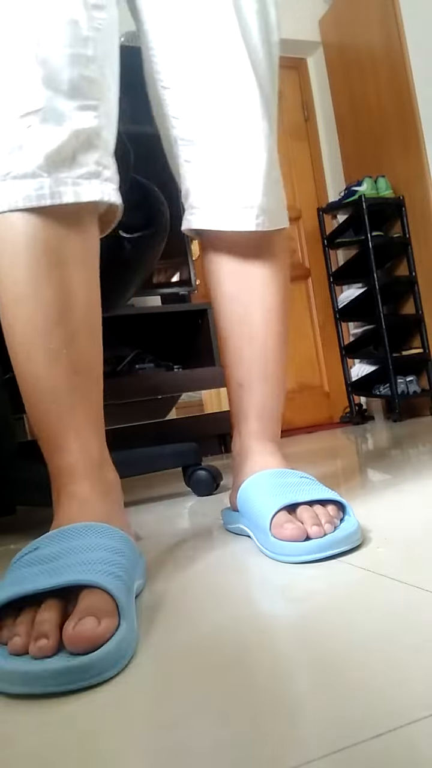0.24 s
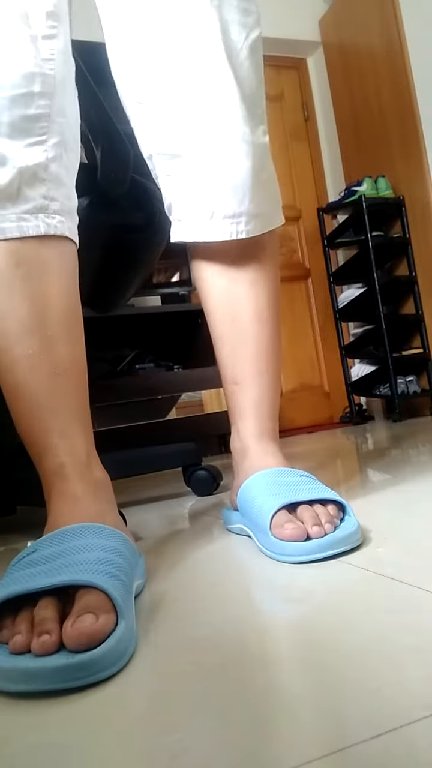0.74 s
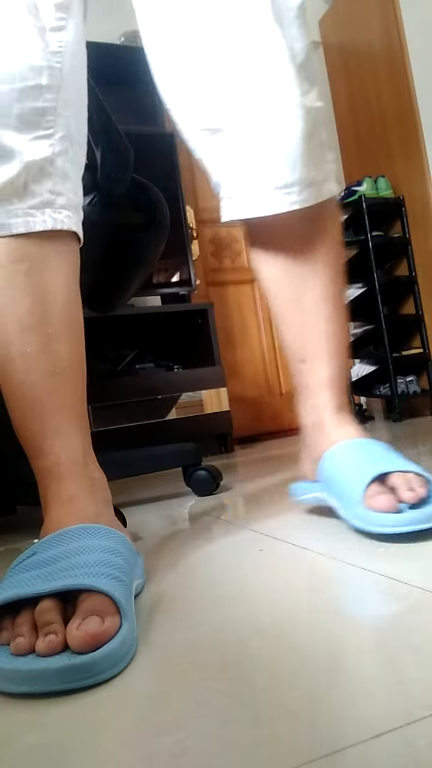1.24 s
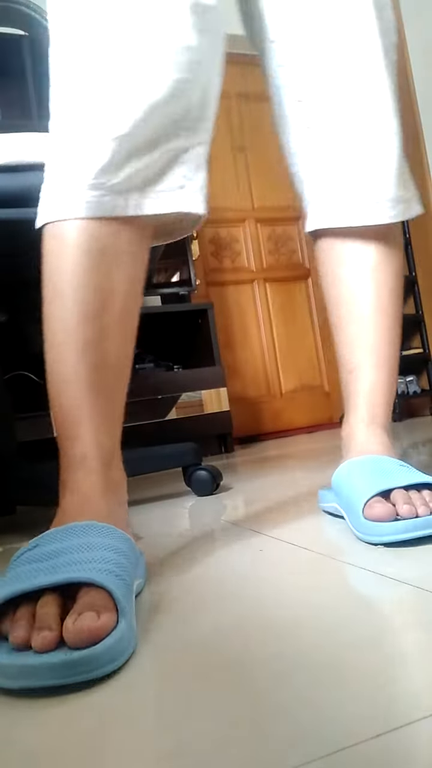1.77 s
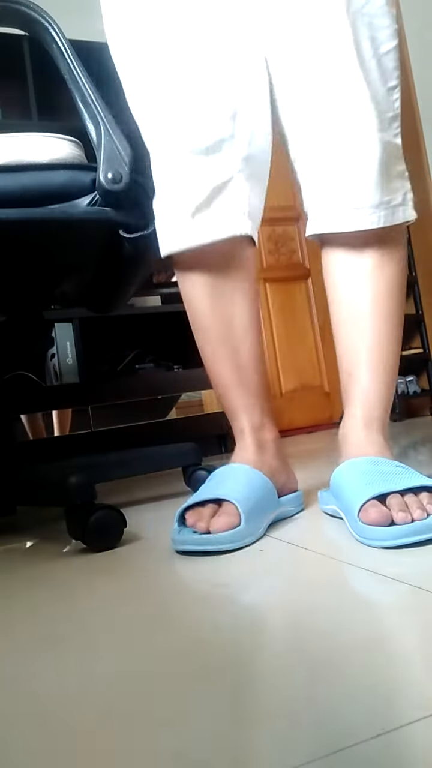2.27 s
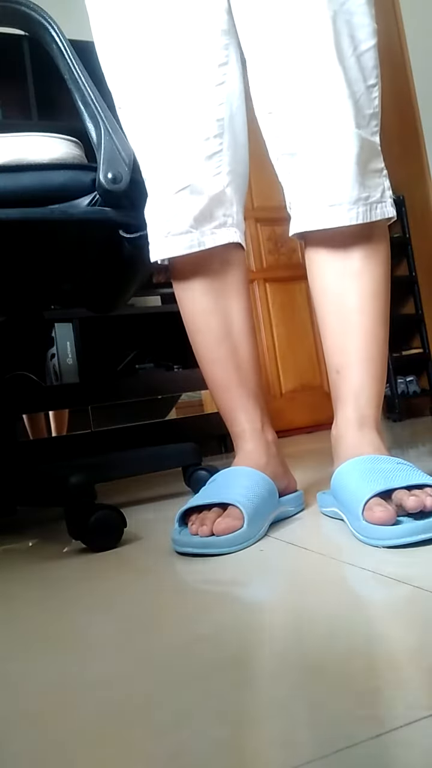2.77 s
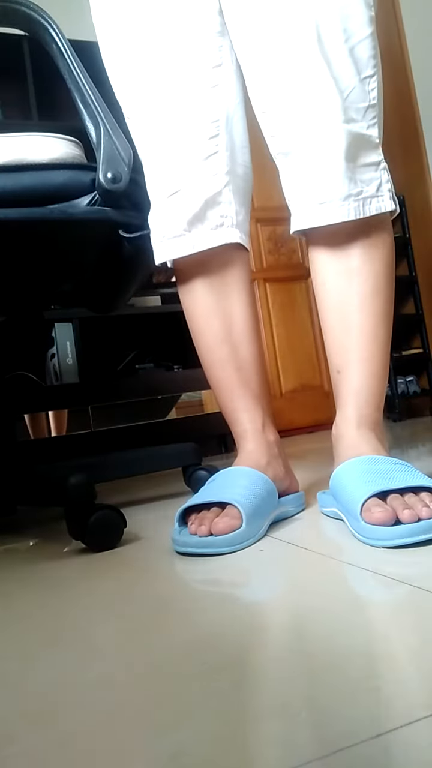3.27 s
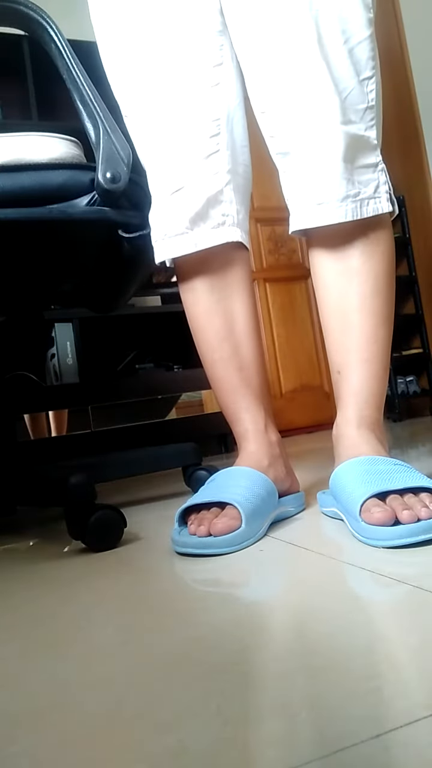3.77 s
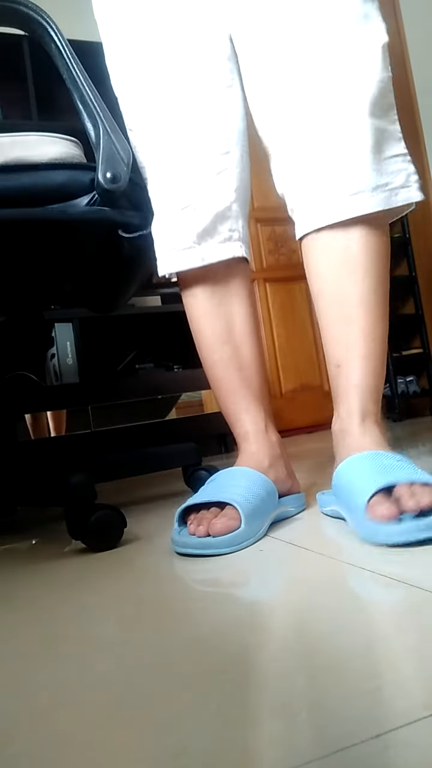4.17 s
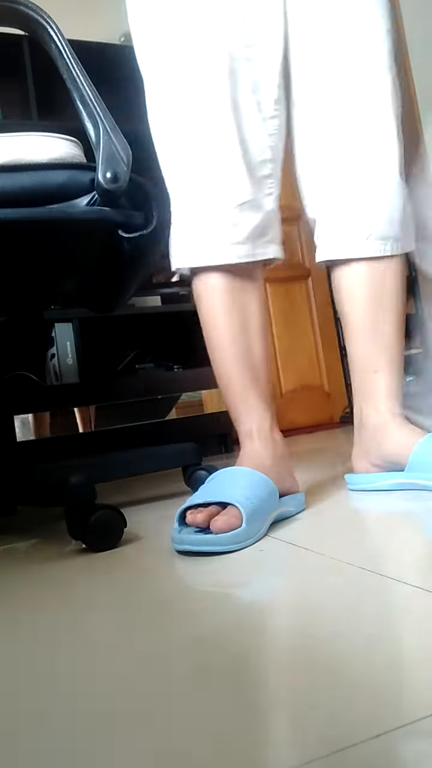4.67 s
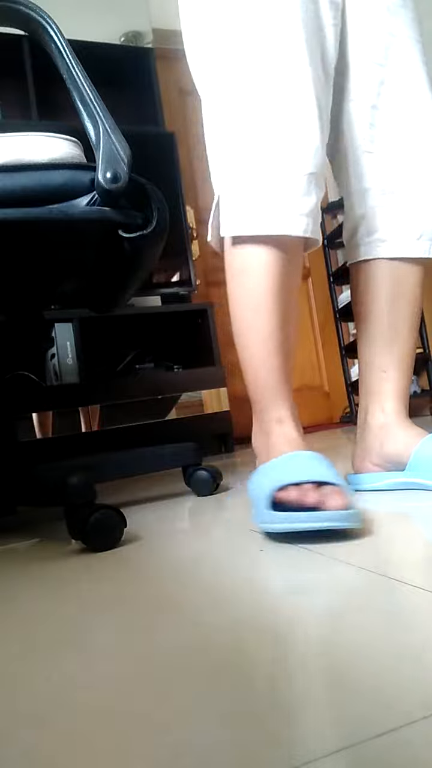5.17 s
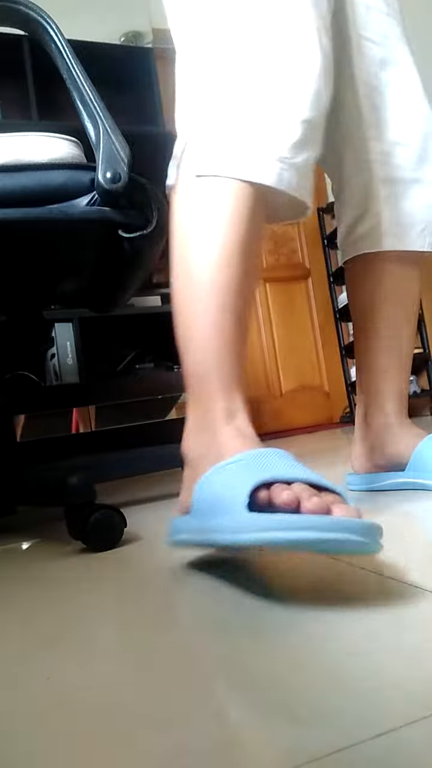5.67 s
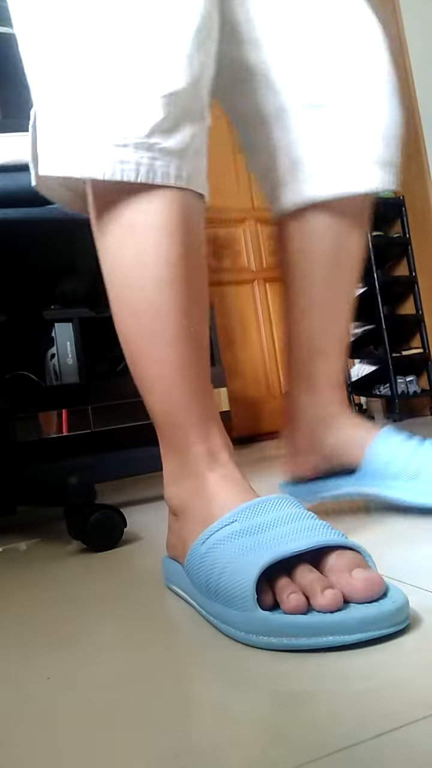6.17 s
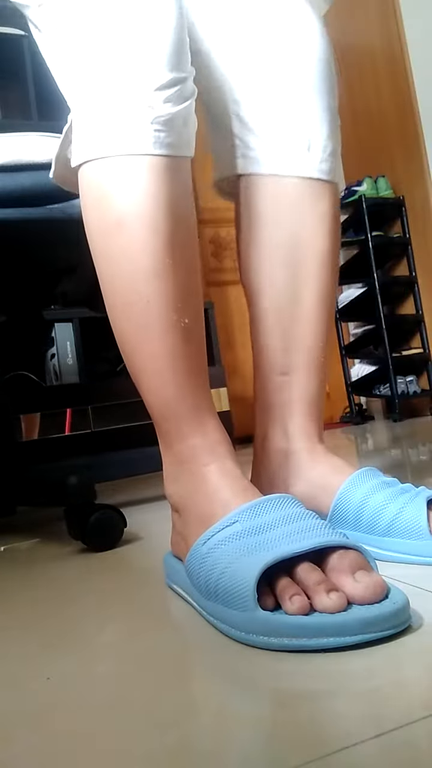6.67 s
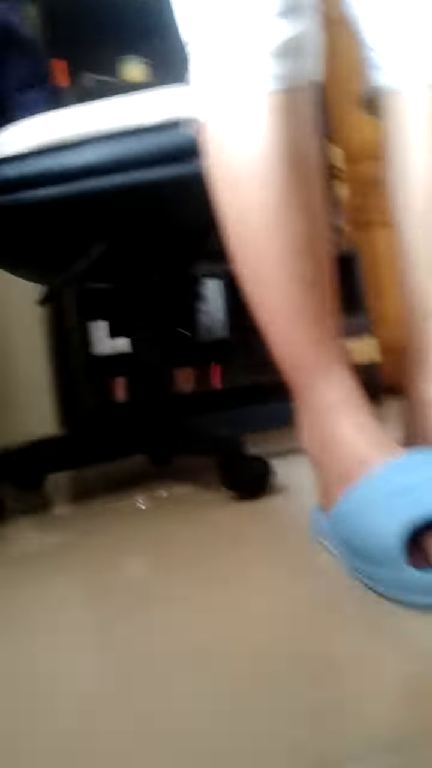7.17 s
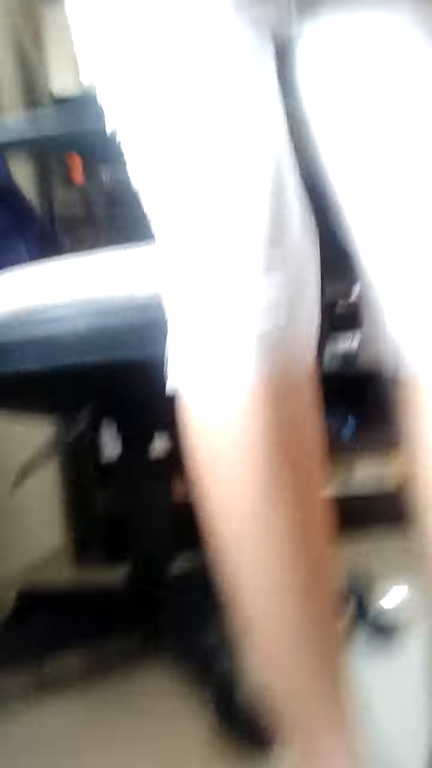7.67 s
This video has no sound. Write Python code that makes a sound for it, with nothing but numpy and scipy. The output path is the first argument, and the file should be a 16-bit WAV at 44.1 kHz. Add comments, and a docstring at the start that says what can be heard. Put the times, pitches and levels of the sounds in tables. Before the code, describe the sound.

A phone near the floor of a small hard room picks up a person stepping in foam slides. Faint ticks and cloth rustle come first, then a sharp squeaky scuff, a chirp, a loud hollow knock with smaller taps, a rising squeak, and later clicks and a brief squeak as the feet come closer. Steady hiss and lumpy low rumble continue throughout.

```python
"""Foam sandals on tile

A small hard room with a tiled floor, heard from a phone near the ground as the feet move near and far.
The soles squeak in short stick-slip glides, tick in short rings as they peel and knock as a push rings
sole and floor; scuffs and rustling trousers are shaped noise, and soft thumps are low fading tones.
A steady hiss and a lumpy low rumble lie under it, and the phone's gain sinks after the loudest sounds."""
import sys
import numpy as np
from scipy import signal
from scipy.fft import rfft, irfft, next_fast_len
from scipy.io import wavfile
from scipy.ndimage import uniform_filter1d, map_coordinates

SR = 44100
rng = np.random.default_rng(int(sys.argv[2]) if len(sys.argv) > 2 else 0)


def waveform_to_disk(signal):
    """Save audio, clipped to [-1, 1], as 16-bit WAV at the path in sys.argv[1]."""
    frames = np.transpose(np.atleast_2d(signal))
    scaled = np.clip(frames, -1, 1) * 32767
    samples = np.round(scaled).astype(np.int16)
    wavfile.write(sys.argv[1], SR, samples)


N = 349429  # length in samples

# All source levels are ahead of the microphone; colours are relative, since each noise is set to rms 1.
# Colours of the background: hiss, its wavering low edge, rumble, murmur, deep rumble: pitch_hz, level_db
HISS_COLOUR = [(700, -14.5), (850, -16.5), (1050, 6.5), (1300, 4.5), (2900, 3.5), (4000, -2), (5000, -12.5),
               (7000, -12.5), (10000, -8), (15700, 3.5)]
HISS_EDGE_COLOUR = [(480, -23.5), (600, -7.5), (750, -10.5), (900, 3.5), (1050, -1), (1300, -25)]
RUMBLE_COLOUR = [(55, -32), (75, -15), (95, 0.5), (120, -13.5), (160, -9), (220, -36)]
MURMUR_COLOUR = [(130, -0.5), (170, -11), (250, 2), (330, -5.5), (550, -9.5), (700, -23)]
DEEP_COLOUR = [(12, -19), (25, 9), (35, -11), (52, 8.5), (65, -3.5), (85, -62)]
# Background levels before the random swells: time_s, rumble_db, murmur_db, hiss_edge_db, deep_db
LOW_LEVELS = [(0.0, -63, -75.5, -56.5, -66), (0.6, -56, -62.5, -68, -59.5), (0.93, -58, -64.5, -63, -62),
              (1.39, -60.5, -62, -63.5, -58.5), (1.7, -55, -71, -57, -55), (1.98, -62, -69.5, -51, -60.5),
              (2.56, -61, -66, -57.5, -62), (3.04, -60.5, -71, -56.5, -64), (3.22, -53, -63.5, -52, -62),
              (3.46, -52, -53, -43.5, -61), (3.62, -74, -105, -51, -57), (3.84, -64, -71, -60, -64.5),
              (4.12, -62, -68, -57.5, -67), (4.59, -63, -69, -53.5, -64), (4.89, -47.5, -66, -56.5, -53),
              (5.23, -52.5, -60.5, -54.5, -56), (5.47, -60.5, -64.5, -52, -66), (5.78, -60, -62, -55, -62),
              (6.24, -63, -70.5, -56.5, -65), (6.51, -50.5, -64.5, -47.5, -55),
              (6.97, -62.5, -66.5, -59, -61.5), (7.34, -49, -61, -61, -60), (7.63, -67, -66, -73, -72),
              (7.92, -54, -71, -61, -64)]
HISS_DB = -42
LUMPS_PER_S, LUMP_DB, SHARED_DB = 8, 3, 2.5  # random swells: knots a second, each layer alone, all together

# Knocks of the sole landing: start_s, level_db (relative), floor_thud_db (relative to sole), hardness_hz
KNOCKS = [(0.082, -32, -11.5, 1500), (3.297, -22, -3.5, 1800), (3.3009, -23, -10, 1480),
          (3.305, -28, -6, 1500), (3.3115, -1, -20.5, 1420), (3.4035, -23, -24, 1200),
          (3.4065, -22, -29, 1230), (3.4102, -19, -25, 1180), (3.416, -20, -22, 950),
          (3.4924, -22.5, -33, 1600), (3.5035, -28, -45, 1440), (3.5112, -29, -38, 1140),
          (3.5188, -35, -18.5, 1280), (4.654, -34, -9.5, 1200), (4.66, -37, -10, 1000),
          (4.684, -33, -35, 990), (5.957, -27, -47, 900), (6.413, -25, -7, 1490), (7.124, -35, -15, 1500),
          (7.888, -37.5, -16, 1500)]
# Modes of the hollow sole: pitch_hz, width_hz, level_db
SOLE_MODES = [(576, 217, 8.5), (680, 365, 6), (1140, 290, 2), (1600, 1240, -8)]
# Modes of the floor and the air over it: pitch_hz, width_hz, level_db
FLOOR_MODES = [(97.2, 4, -3.5), (146, 10.7, -1.5), (238.7, 26, 7.5), (249, 125, -2)]
# Sole and skin peeling apart: start_s, level_db (relative), pitch_hz, ring_t60_s (before its limits),
# crack_db (relative to ring)
TICKS = [(0.0827, -31, 1850, 0.018, -4), (1.038, -33, 1930, 0.013, -4), (1.076, -33, 2380, .012, -12),
         (1.842, -27, 3060, 0.0074, -2), (1.8592, -26, 3050, 0.0089, 2), (1.8844, -45, 2040, .012, 0),
         (1.9148, -33, 2240, 0.0091, 0), (4.3055, -27, 2550, 0.011, -6), (4.634, -33, 2300, 0.018, -23),
         (5.9305, -9.5, 1800, 0.0017, -34), (5.9546, -21.5, 1690, 0.0054, -17),
         (5.9585, -24, 2040, .01, -19), (6.063, -32, 2300, 0.014, -4), (6.348, -25.5, 1660, 0.0087, -14),
         (6.3614, -17.5, 1820, 0.0042, -16), (6.391, -23, 2070, 0.0066, -8),
         (7.1244, -8.5, 1850, 0.0021, -15), (7.349, -51.5, 2000, .01, 19.5), (7.539, -39, 1740, .012, -5),
         (7.8893, -36.5, 2710, 0.014, -28)]
# Swells of cloth: start_s, length_s, start_level_db, end_level_db
RUSTLES = [(.28, .33, -37.5, -41.5), (.85, 0.061, -48, -52), (3.91, .11, -61, -58), (4.85, 0.18, -50, -48)]
# Colour of the cloth: pitch_hz, level_db
CLOTH_COLOUR = [(3000, -29), (6000, -2.5), (8700, -0.5), (11600, 11), (15500, 7)]
RUSTLE_RISE_DB_PER_S, RUSTLE_FALL_DB_PER_S = 750, 480
# Weight shifting and phone handling: start_s, level_db (before the soft start), pitch_hz, t60_s
THUMPS = [(0.346, -31, 97.7, 0.16), (0.435, -32.5, 86, 0.15), (2.212, -40, 94, 0.3),
          (3.069, -36, 95.5, 0.32), (3.306, -23.5, 88.6, 0.2), (4.768, -31.5, 94.5, 0.18),
          (4.996, -33.5, 88, 0.13), (5.078, -31.5, 90.5, 0.12), (5.688, -32, 103.4, 0.14),
          (6.417, -34, 97, 0.4), (6.469, -27, 92.6, 0.21), (6.649, -37, 99, 0.26), (5.71, -37, 159, 0.17),
          (7.185, -38, 252, 0.14), (7.285, -36, 146, 0.2), (7.59, -43, 250, 0.13),
          (7.402, -31.5, 139, 0.19)]
# A sole slaps flat and drags: start_s, length_s, start_level_db, end_level_db (before the grains)
SCUFFS = [(1.04, 0.045, -51, -38.5), (1.845, 0.12, -39.5, -44.5), (1.94, 0.071, -19, -48),
          (3.297, 0.13, -28.5, -60), (4.311, 0.031, -25.5, -35.5), (6.065, 0.22, -33, -78),
          (6.153, .047, -57, -39), (6.414, 0.019, -28.5, -51), (7.889, 0.02, -35.5, -74)]
# Colour of the grit: pitch_hz, level_db
GRIT_COLOUR = [(300, -63), (600, 2.5), (2500, 10), (6000, 0), (9000, 1), (15000, 11)]
SCUFF_RISE_DB_PER_S, SCUFF_FALL_DB_PER_S = 9000, 2500
# Sole slipping on tile: start_slope_db, end_slope_db (overtones; above 0 counts as 0), roughness (0-1),
# glide of (time_s, slip_rate_hz, level_db before the bass cut)
SQUEAKS = [ (-14, -20, 0.31, [(1.936, 1910, -39), (1.941, 2264, -13), (1.95, 2247, -20.5),
           (1.955, 2265, -37), (1.962, 2370, -15.5), (1.97, 2400, -39.5)]),
           (0, -1, 0.43, [(1.939, 3230, -21.5), (1.953, 3037, -21.5), (1.957, 3080, -39)]),
           (-10, -0.5, 0.27, [(1.947, 950, -56), (1.953, 993, -25), (1.963, 1236, -17),
           (1.973, 1343, -16.5), (1.979, 1380, -49)]), (1, -10, .05, [(2.348, 5060, -35),
           (2.352, 4760, -31.5), (2.36, 4020, -25), (2.364, 3520, -34), (2.368, 3100, -39)]),
           (-8.5, -2, 0.11, [(2.367, 2590, -14), (2.371, 2448, -36), (2.378, 1678, -20.5),
           (2.386, 1437, -28), (2.396, 1420, -27), (2.404, 1300, -28)]),
           (-18, -20, 0.055, [(4.311, 2180, -37), (4.3125, 2280, -16.5), (4.3155, 2317, -30),
           (4.317, 2380, -39)]), (11, -3, 0.32, [(4.317, 2590, -34), (4.321, 2963, -27),
           (4.33, 3530, -24.5), (4.336, 3700, -23.5), (4.34, 3980, -20), (4.343, 4230, -34),
           (4.348, 4420, -24)]), (-3, -1, 0.56, [(6.064, 1020, -68), (6.082, 1206, -38), (6.096, 938, -59),
           (6.114, 957, -41)]), (1.5, -9.5, 0.25, [(6.124, 1163, -41), (6.14, 1634, -34),
           (6.146, 1650, -36), (6.151, 1703, -14.5), (6.156, 1876, -22), (6.165, 2020, -26)]),
           (-25, -30, 0.26, [(6.385, 4740, -41), (6.387, 3870, -22), (6.391, 3700, -45)]), ]

# Nearest surfaces: delay_s, level_db (relative)
WALLS = [(.0011, -9.5), (.0027, -9), (.0046, -2), (.0071, -4), (.0098, 1.5), (.0134, 3), (0.0206, -10),
         (0.022, -15)]
# Decay of the room: pitch_hz, t60_s
ROOM_DECAY = [(100, 0.33), (500, 0.37), (1300, 0.42), (3500, 0.43), (9000, 0.39)]
# How much the room answers as the sounding foot is far from the phone or near: time_s, level_db (relative)
FOOT_DISTANCE = [(0, 3), (1.9, -4), (2.4, -2), (3.3, -7), (3.4, -13), (3.55, 4), (4.315, -13.5), (4.34, 0),
                 (5.9, -1), (6.15, -6.5), (6.4, 0.5), (7.12, -4.5), (7.92, 7.5)]
SOFT_HZ = 6100  # walls and furniture swallow the treble above this
# Colour of the phone microphone: pitch_hz, level_db
MICROPHONE = [(20, 3), (3600, 2), (4300, -2), (5000, -8), (7000, -17.5), (11600, -23.5), (15700, -31)]
TOP_HZ = 15780  # nothing is heard above this


def amp(db):
    """Gain of a level in dB."""
    return 10 ** (np.asarray(db) / 20)


def along(points, hz):
    """Values at hz, read between (Hz, value) points on a log axis."""
    f, v = np.transpose(points)
    return np.interp(np.log(hz + 1), np.log(f + 1), v)


def curves(rows):
    """One value per sample for each column after the time."""
    s, *cols = np.transpose(rows)
    return [np.interp(np.arange(N) / SR, s, c) for c in cols]


def filtered(x, response):
    """x passed through a complex response of frequency."""
    m = next_fast_len(N + SR // 2)
    spectrum = rfft(x, m) * response(np.fft.rfftfreq(m, 1 / SR))
    return irfft(spectrum, m)[..., :N]


def no_bass(x, corner_hz):
    """A small source sends out little bass: a gentle slope below the corner."""
    return filtered(x, lambda hz: 1j * hz / (corner_hz + 1j * hz))


def resonances(modes):
    """The causal response of a few damped modes, added with alternating sign."""
    def response(f):
        total = 0
        for k, (centre, width, db) in enumerate(modes):
            damping = 1j * f * width
            total = total + (-1) ** k * amp(db) * damping / (centre ** 2 - f * f + damping)
        return total
    return response


def noise(colour, patchy_db):
    """Coloured noise of rms 1 with patches of random gain in time and pitch."""
    z = signal.stft(rng.standard_normal(N), nperseg=2048)[2]
    field = uniform_filter1d(rng.standard_normal(z.shape), size=3, axis=0)
    field = uniform_filter1d(field, size=3, axis=1)
    x = signal.istft(z * amp(patchy_db * field / field.std()), nperseg=2048)[1][:N]
    # the colour falls away to -90 dB an octave beyond either end
    closed = [(colour[0][0] / 2, -90), *colour, (colour[-1][0] * 2, -90)]
    x = filtered(x, lambda hz: amp(along(closed, hz)))
    return x / x.std()


def wobble(rate):
    """A smooth random curve, rate knots a second."""
    knots = rng.standard_normal(int(N * rate / SR) + 4)
    return map_coordinates(knots, [np.arange(N) * rate / SR])


def strokes(rows, rise, fall):
    """Envelope of strokes: a rise, a steady drift in level, a fall (slopes in dB per s)."""
    t, total = np.arange(N) / SR, np.zeros(N)
    for s, length, start_db, end_db in rows:
        drift_db = np.interp(t, [s, s + length], [start_db, end_db])
        before_db = rise * np.maximum(s - t, 0)
        after_db = fall * np.maximum(t - s - length, 0)
        total += amp(drift_db - before_db - after_db)
    return total


def background():
    """A hiss over low noise layers that swell and sink at random, each alone and all together."""
    shared_db = SHARED_DB * wobble(LUMPS_PER_S)
    rumble_db, murmur_db, edge_db, deep_db = (
        db + shared_db + LUMP_DB * wobble(LUMPS_PER_S) for db in curves(LOW_LEVELS))
    rumble = amp(rumble_db) * noise(RUMBLE_COLOUR, patchy_db=1.5)
    deep = amp(deep_db) * noise(DEEP_COLOUR, patchy_db=0.3)
    murmur = amp(murmur_db) * noise(MURMUR_COLOUR, patchy_db=4.5)
    edge = amp(edge_db) * noise(HISS_EDGE_COLOUR, patchy_db=4.5)
    hiss = amp(HISS_DB) * noise(HISS_COLOUR, patchy_db=1.6)
    return hiss + rumble + deep + murmur + edge


def knocks():
    """A landing is a push, shorter when the blow is harder, that rings the sole and the floor."""
    sole, floor, t = np.zeros(N + SR), np.zeros(N + SR), np.arange(SR // 50) / SR
    for s, db, thud_db, hard_hz in KNOCKS:
        push = t * np.exp(-2 * np.pi * hard_hz * t)
        push /= push.sum()
        # the narrow modes take little of a push, hence the added gains
        sole[round(s * SR):][:len(t)] += amp(db + 30) * push
        floor[round(s * SR):][:len(t)] += amp(db + thud_db + 49.0) * push
    return filtered(sole[:N], resonances(SOLE_MODES)) + filtered(floor[:N], resonances(FLOOR_MODES))


def ticks():
    """Peeling gives a short damped ring with a thin crack of noise."""
    out, t = np.zeros(N + SR), np.arange(SR // 20) / SR
    soft_start = 1 - np.exp(-t / .0003)
    for s, db, hz, t60, crack_db in TICKS:
        t60 = np.clip(t60, 1 / 500, 1 / 60)
        ring = np.sin(2 * np.pi * hz * t) * amp(-60 * t / t60)
        crack = amp(crack_db - 60 * t / .01) * rng.standard_normal(len(t))  # dies in 10 ms
        out[round(s * SR):][:len(t)] += amp(db + 3.5) * (ring + crack) * soft_start
    return no_bass(out[:N], 900)


def rustle():
    """Trouser cloth rubbing: short swells of bright, faint noise."""
    swells = strokes(RUSTLES, RUSTLE_RISE_DB_PER_S, RUSTLE_FALL_DB_PER_S)
    return swells * noise(CLOTH_COLOUR, patchy_db=5.0)


def thumps():
    """Slow pushes: each is one low decaying ring with a soft start."""
    out, t = np.zeros(N + SR), np.arange(SR // 2) / SR
    soft_start = 1 - np.exp(-t / 0.013)
    for s, db, hz, t60 in THUMPS:
        ring = amp(db - 60 * t / t60) * np.sin(2 * np.pi * hz * t)
        out[round(s * SR):][:len(t)] += ring * soft_start
    return out[:N]


def scuffs():
    """A sole slapping and dragging over grit: coloured noise in uneven grains of 40 samples."""
    sizes = np.minimum(rng.exponential(size=N // 40 + 1), 3)
    grains = amp(2.5 * sizes.repeat(40)[:N] - 3)
    drags = strokes(SCUFFS, SCUFF_RISE_DB_PER_S, SCUFF_FALL_DB_PER_S)
    return drags * noise(GRIT_COLOUR, patchy_db=3.5) * grains


def squeaks():
    """Stick-slip: overtones on the slip rate, shaken by uneven grip, with a puff of noise at each slip."""
    out, k = np.zeros(N), np.arange(1, 9)[:, None]  # k numbers the overtones
    for first_db, last_db, rough, glide in SQUEAKS:
        s, *cols = np.transpose(glide)
        at = np.arange(round(s[0] * SR), round(s[-1] * SR))
        hz, db = (np.interp(at / SR, s, c) for c in cols)
        chance = rng.standard_normal((3, 4000))
        # smoothed over 40 samples, then restored to unit spread
        grip = uniform_filter1d(chance, size=40, axis=1)[:, :len(at)] * np.sqrt(40)
        slope_db = np.minimum(np.linspace(first_db, last_db, len(at)), 0)
        phase = np.cumsum(2 * np.pi * hz * (1 + 0.14 * rough * grip[0])) / SR
        # the slip is nearly symmetric, so even overtones are weaker
        overtone_db = slope_db * (k - 1) ** 1.64 - 5.0 * (k % 2 == 0)
        stack = amp(overtone_db) * np.sin(k * phase) * (k * hz < TOP_HZ)
        tone = (1 + 0.85 * rough * grip[1]) * stack.sum(0)
        puffs = amp(-13.0) * rough * chance[2, :len(at)] * (1 + np.cos(phase))
        out[at] += amp(db) * (tone + puffs) * signal.windows.tukey(len(at), .1)
    return no_bass(out, 700)


def walls(x):
    """Early echoes: delayed copies from the tiles, the furniture and the door."""
    return sum(amp(db) * np.pad(x, (round(s * SR), 0))[:N] for s, db in WALLS)


def room(x):
    """Each frequency dies at its own speed; the feet move, so each quarter second has its own tail."""
    step = SR // 4
    parts = np.pad(x, (0, -N % step)).reshape(-1, step)
    hz, t, z = signal.stft(rng.standard_normal((len(parts), SR * 3 // 4)), SR, nperseg=256)
    decay = amp(-60 * t / along(ROOM_DECAY, hz)[:, None])
    tails = signal.istft(z * decay, SR, nperseg=256)[1]
    tails = tails / np.linalg.norm(tails, axis=1, keepdims=True)
    wet = signal.fftconvolve(parts, tails, axes=1)
    out, lag = np.zeros(N + 2 * SR), round(.006 * SR)  # the tail starts 6 ms late
    for k, w in enumerate(wet):
        out[lag + k * step:][:len(w)] += w
    return out[:N]


def scene():
    """The feet with the room's answer, over thumps, rustle and background."""
    bed, low, clicks = background(), knocks(), ticks()
    cloth, pushes = rustle(), thumps()
    slips = scuffs() + squeaks()
    far = amp(curves(FOOT_DISTANCE)[0])
    far_high = far * (slips + amp(-4.0) * clicks)
    far_low = far * low
    echoes = amp(-8.0) * walls(far_high) + amp(-17.0) * walls(far_low)
    answer = echoes + room(amp(0.5) * far_high + amp(-0.5) * far_low)
    soft_answer = filtered(answer, lambda hz: 1 / (1 + 1j * hz / SOFT_HZ))
    feet = slips + clicks + low + soft_answer
    return (feet + pushes + bed + cloth)[None]


def record(dry):
    """Microphone colour, a gain that sinks after loud peaks and recovers slowly, soft clipping, band limit."""
    x = filtered(dry, lambda hz: amp(along(MICROPHONE, hz)))
    hop = SR // 100
    peaks = np.abs(np.pad(x[0], (0, -N % hop))).reshape(-1, hop).max(1)
    excess_db = np.maximum(20 * np.log10(peaks + 1e-9) + 9.0, 0)  # above -9 dB
    cut_db = signal.lfilter([.04], [1, -np.exp(-.01 / 1.6)], excess_db)  # recovers with a 1.6 s time constant
    x = x * amp(-np.interp(np.arange(N), hop * np.arange(len(cut_db)), cut_db))
    x = x / (1 + np.abs(x / .8) ** 4) ** (1 / 4)  # the input stage rounds off the highest peak
    return filtered(x, lambda hz: hz < TOP_HZ)


dry = scene()
out = record(dry)
waveform_to_disk(out)
```